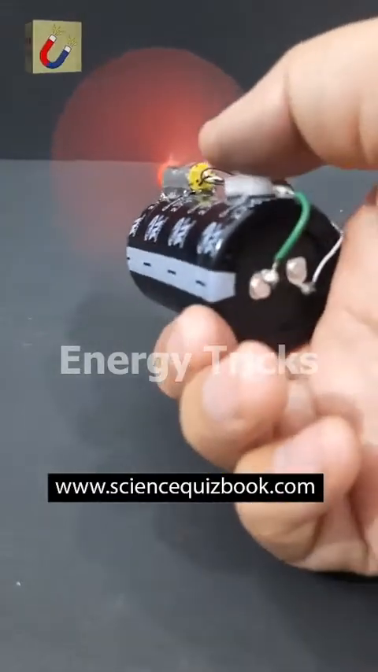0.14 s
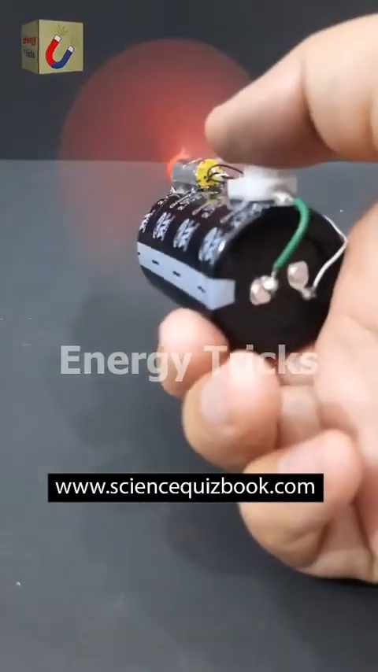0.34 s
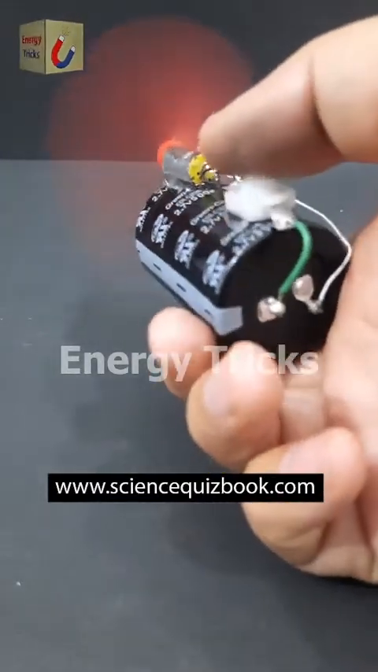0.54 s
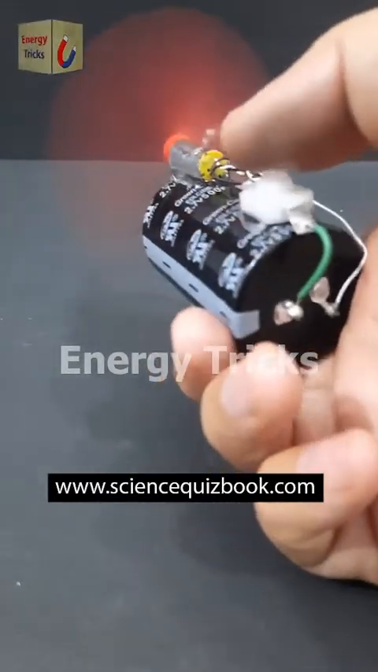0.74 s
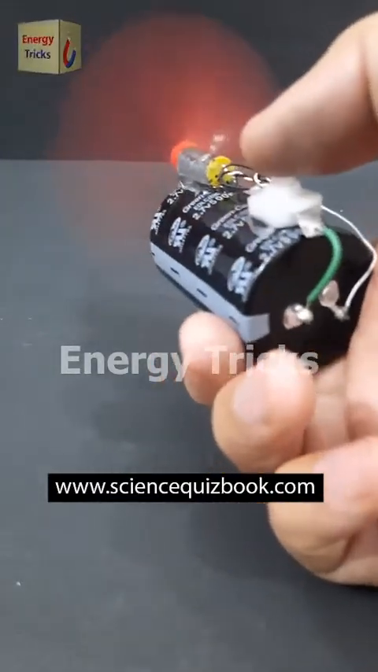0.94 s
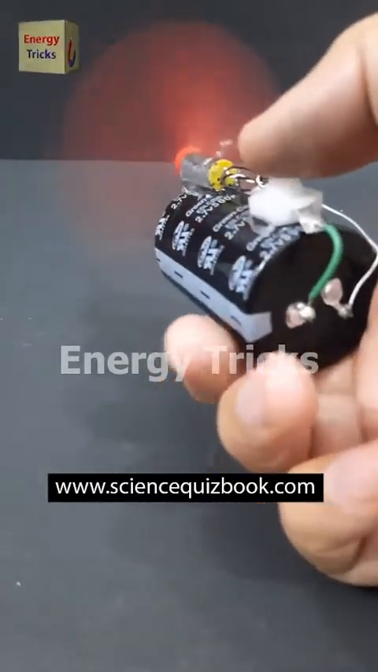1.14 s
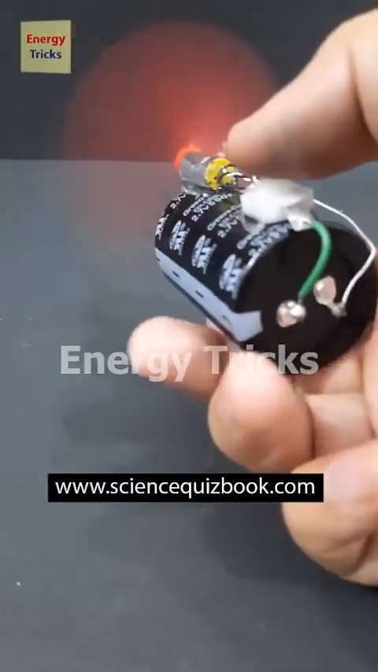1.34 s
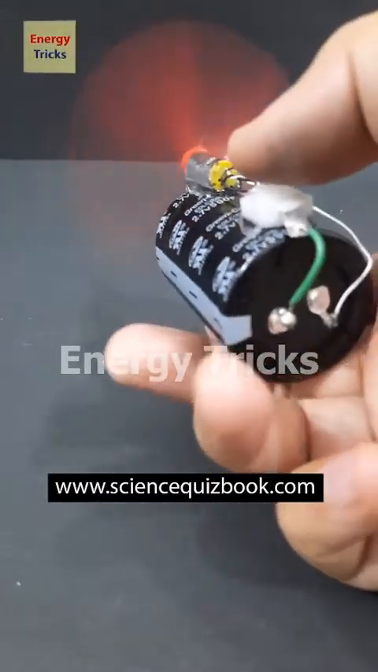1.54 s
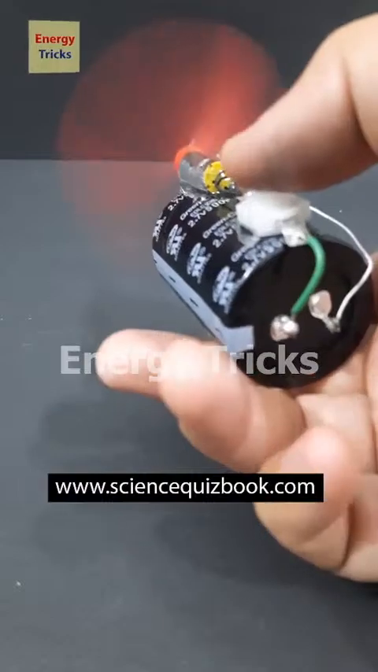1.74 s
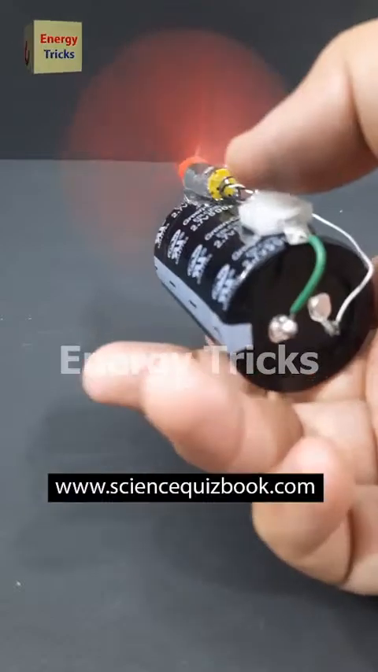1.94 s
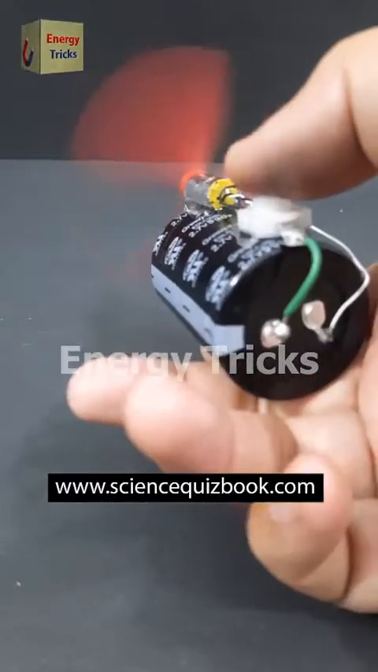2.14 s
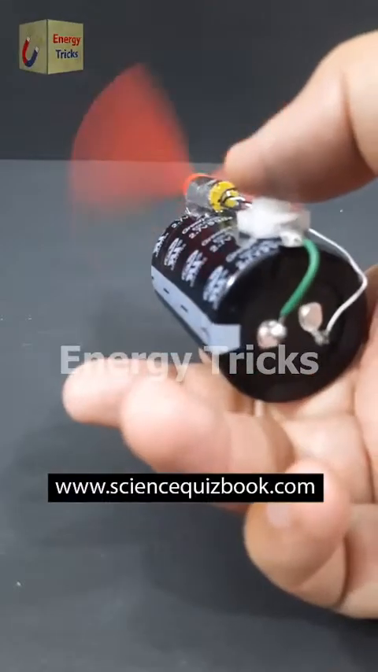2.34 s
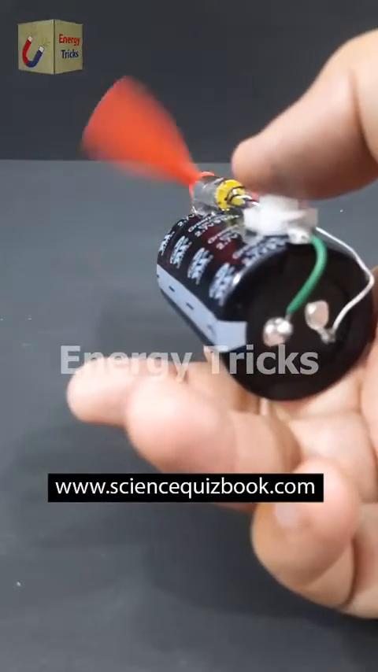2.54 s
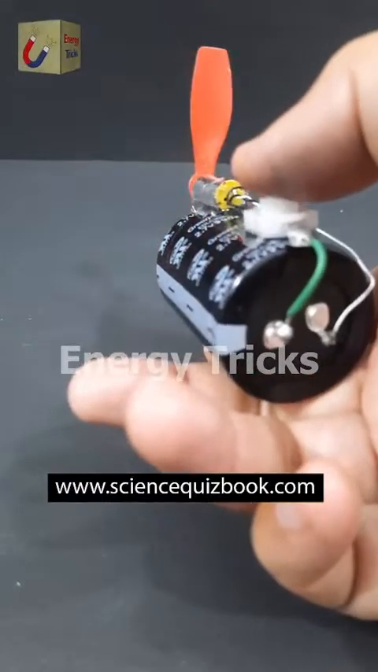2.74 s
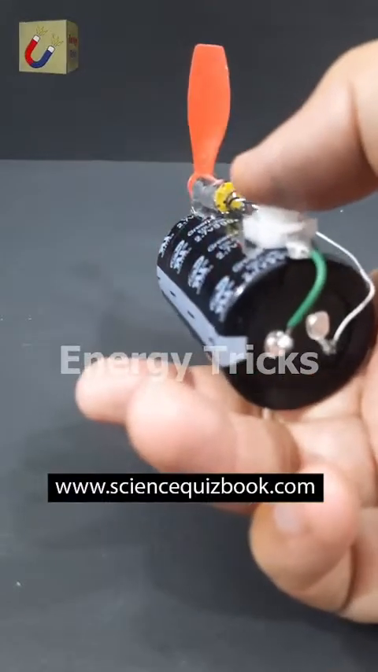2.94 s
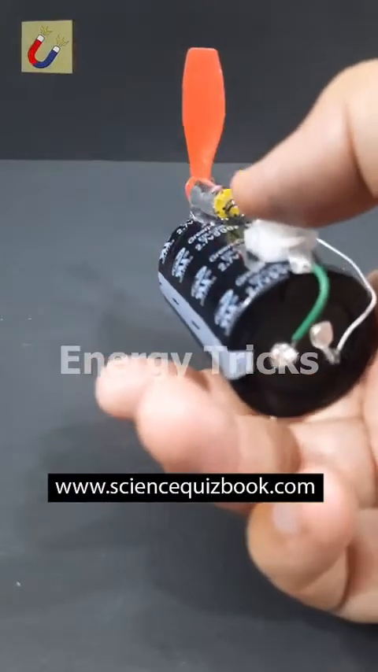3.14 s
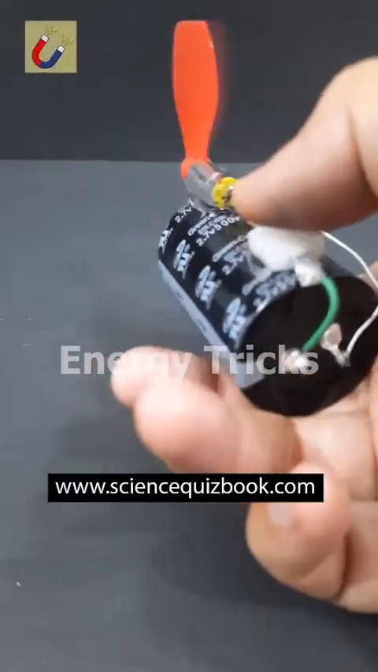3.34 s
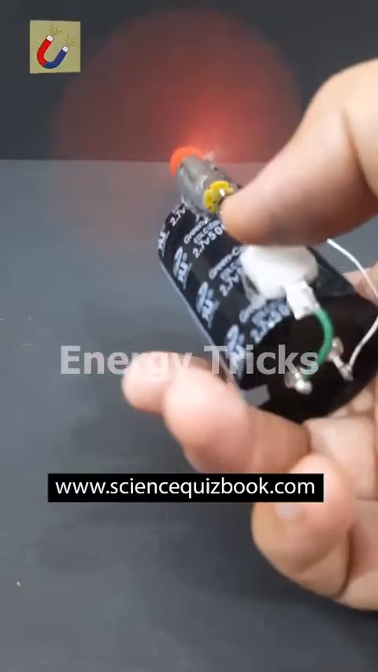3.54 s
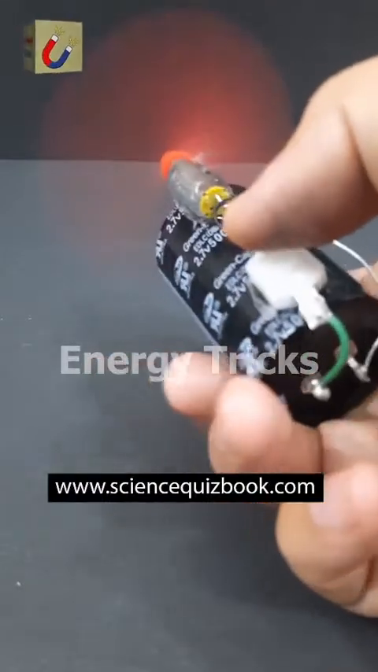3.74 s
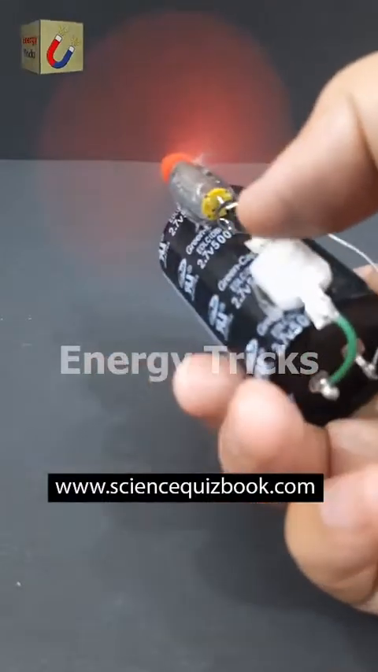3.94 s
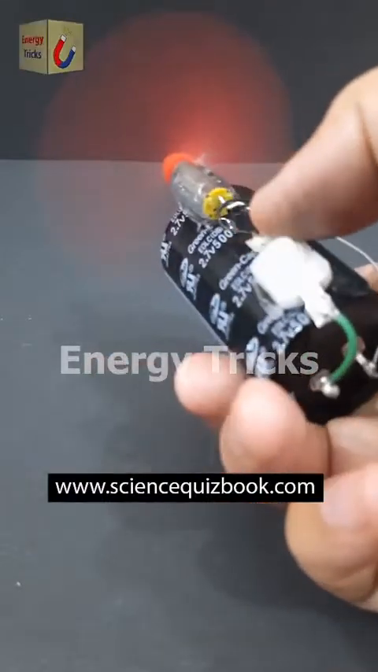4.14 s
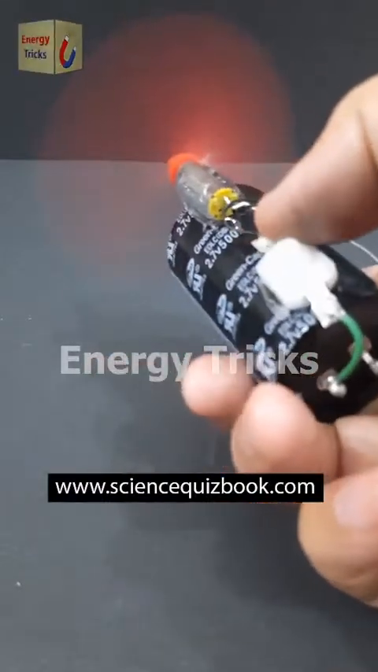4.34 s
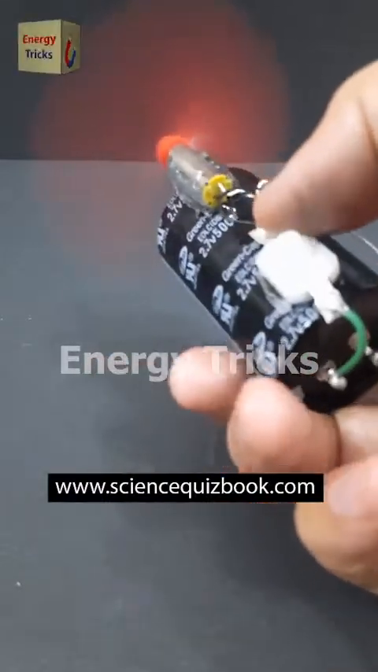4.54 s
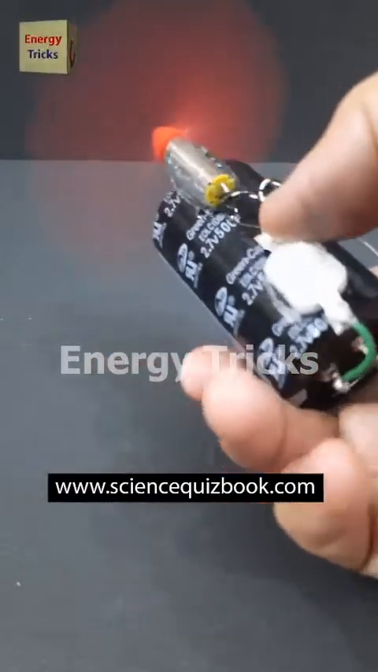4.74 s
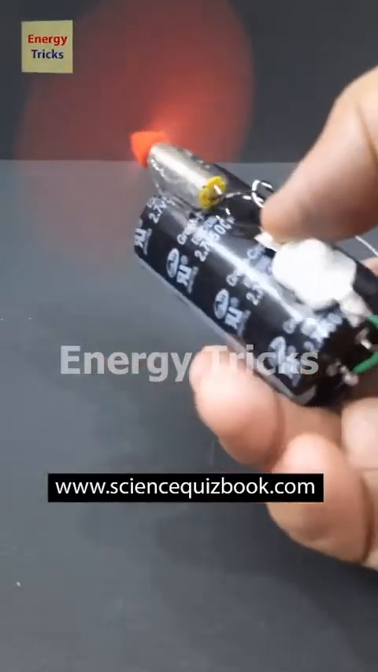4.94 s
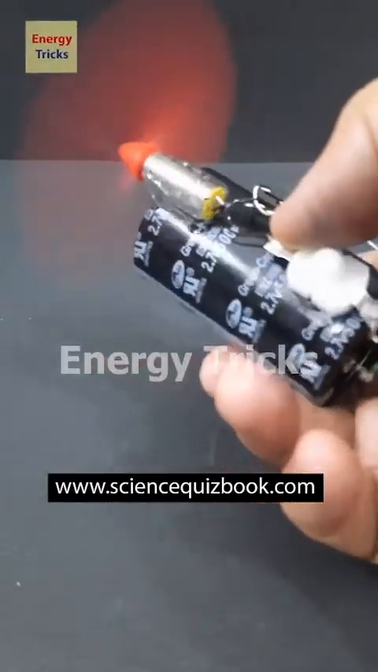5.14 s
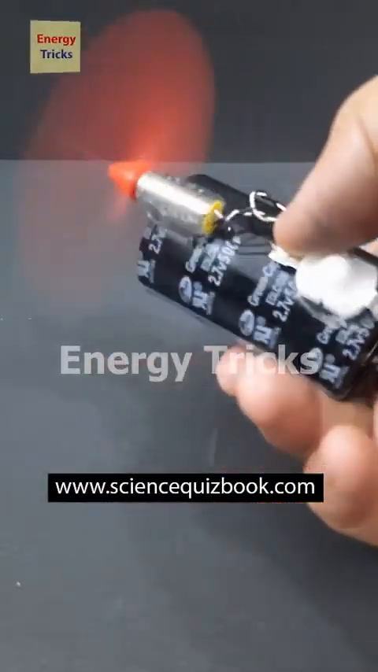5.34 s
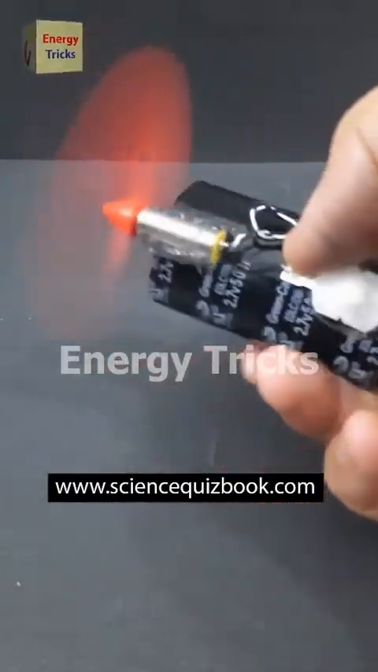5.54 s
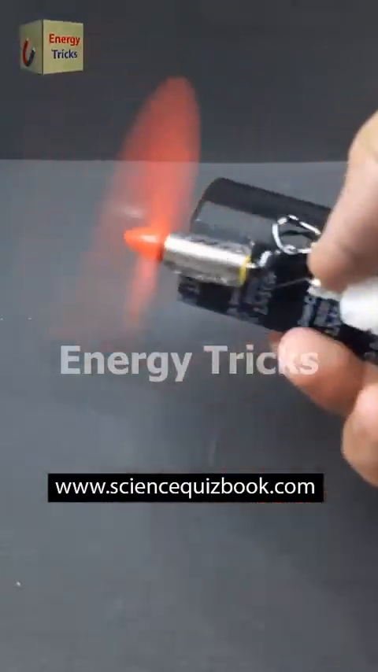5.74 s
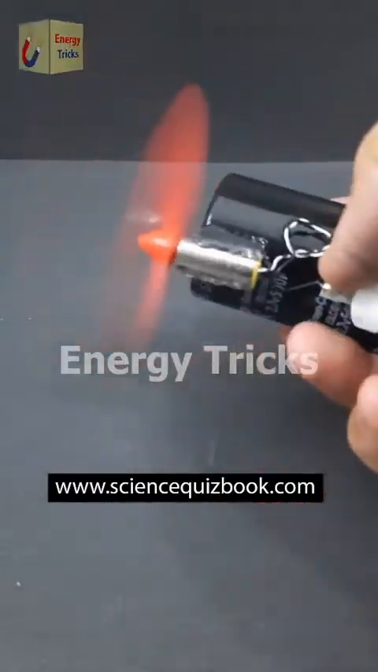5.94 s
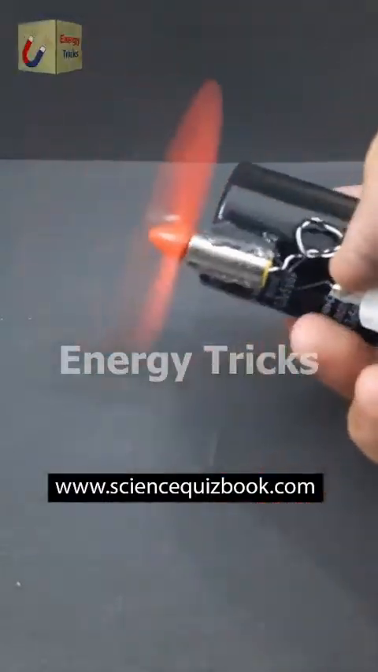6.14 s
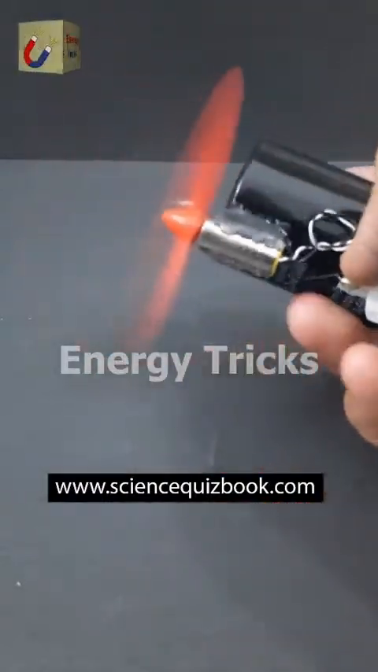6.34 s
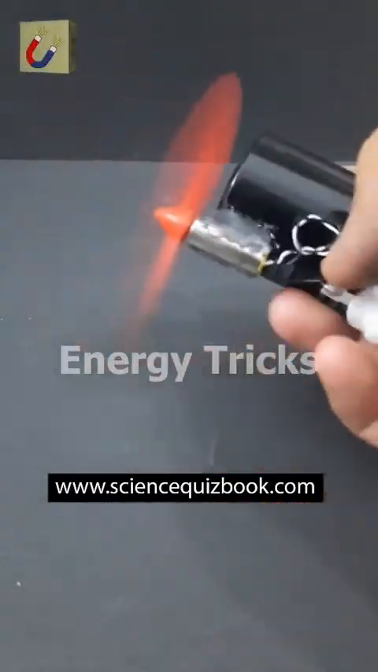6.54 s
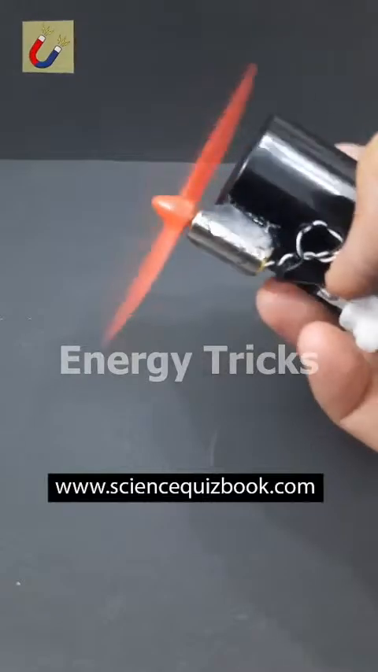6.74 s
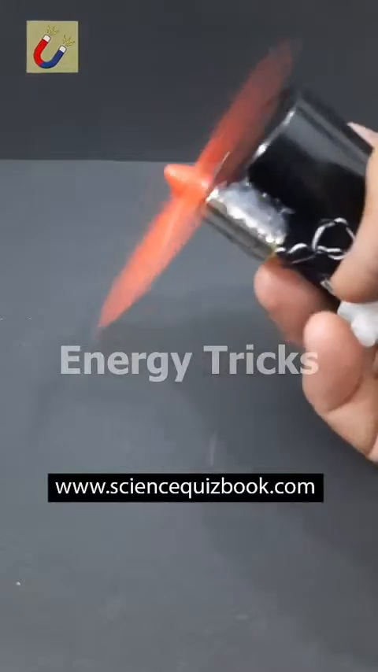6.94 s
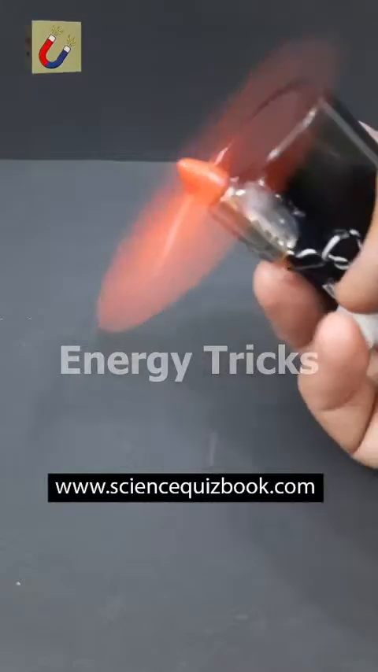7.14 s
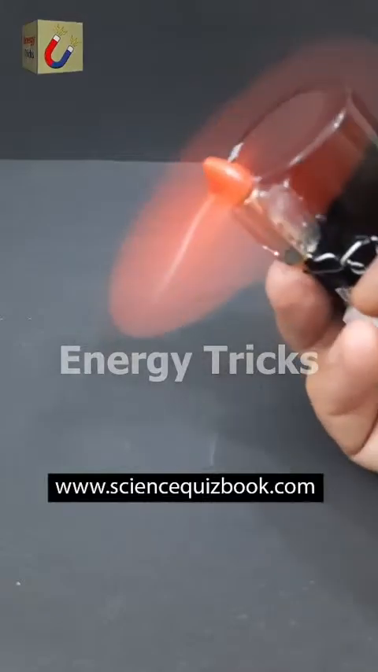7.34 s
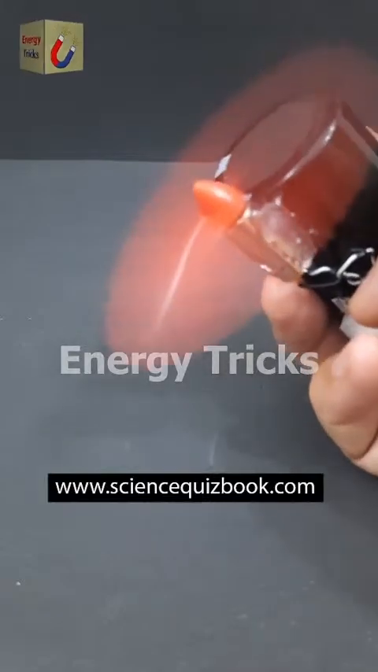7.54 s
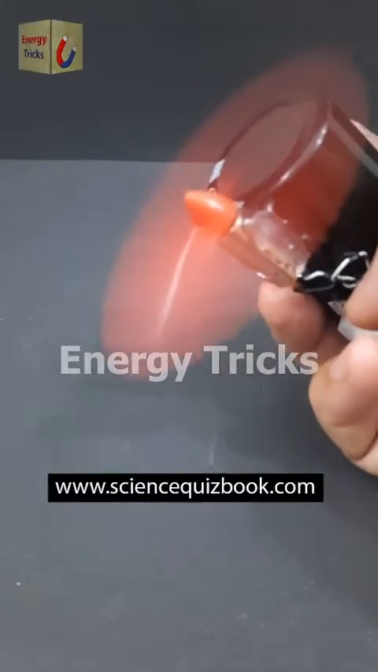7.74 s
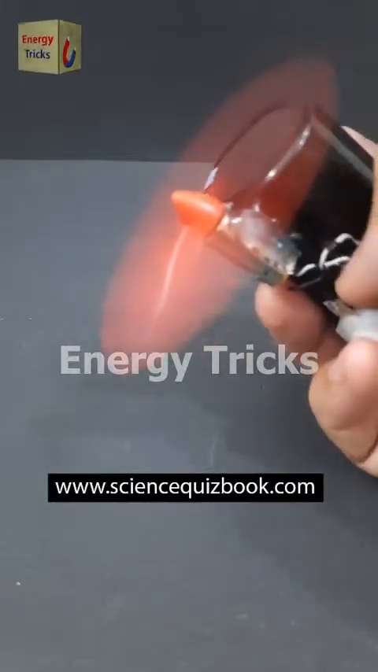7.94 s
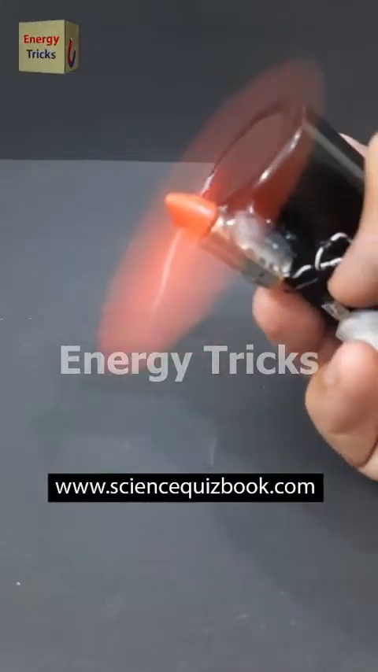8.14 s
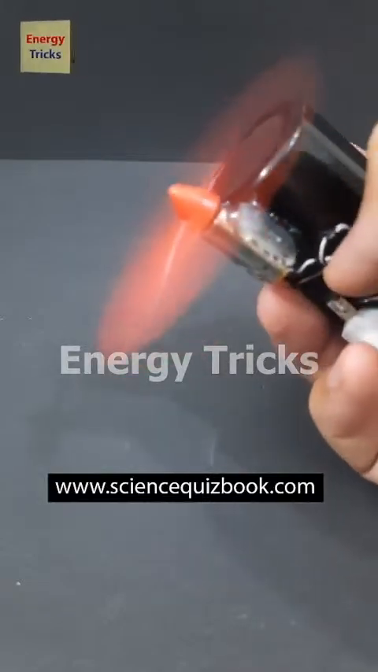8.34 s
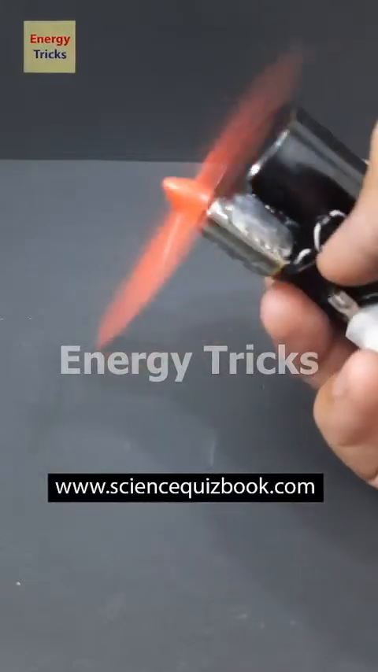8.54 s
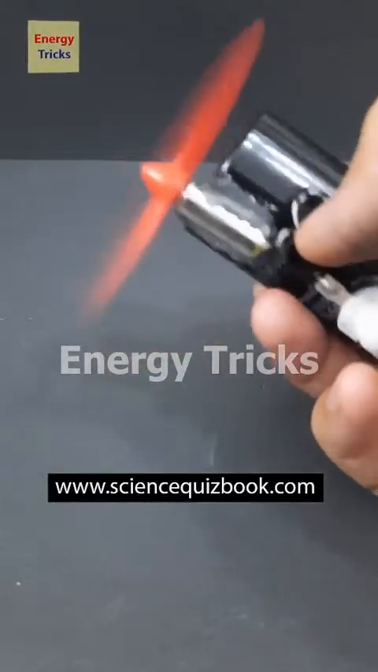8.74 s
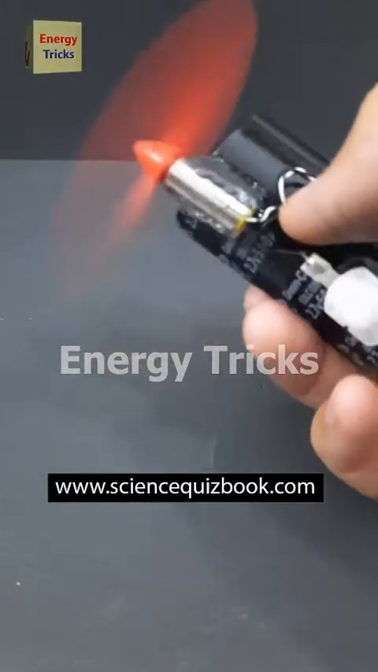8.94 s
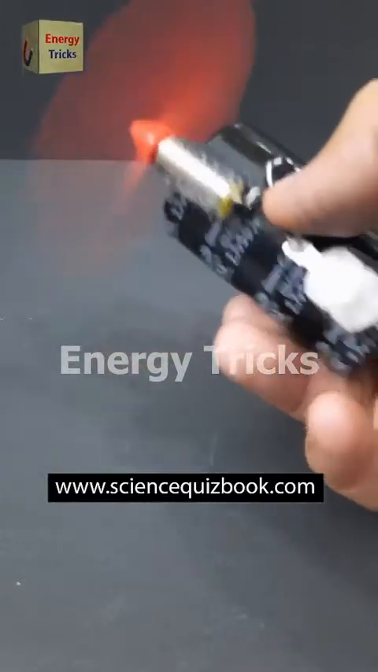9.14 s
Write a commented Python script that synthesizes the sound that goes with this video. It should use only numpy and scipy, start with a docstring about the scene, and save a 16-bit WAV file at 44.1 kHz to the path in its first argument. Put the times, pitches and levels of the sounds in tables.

```python
"""Indoors, close to a two-microphone phone, a hand holds a tiny motor with a two-blade plastic propeller.
It runs down, a push switch clicks, it spins up again and is slowly turned about, so the tones swell and fade.
The tones follow the shaft angle; the air is filtered noise, with gusts mostly on the left microphone port.
A machine hums in the room, and the phone's gain control lifts the sound during the pause."""
import sys
import numpy as np
from scipy import signal
from scipy.fft import rfft, irfft, next_fast_len
from scipy.io import wavfile
from scipy.ndimage import uniform_filter1d, minimum_filter1d, map_coordinates

SR = 44100
rng = np.random.default_rng(int(sys.argv[2]) if len(sys.argv) > 2 else 0)


def dump(signal):
    """Clip the signal to [-1, 1] and save it as 16-bit WAV at the path in sys.argv[1]."""
    limited = np.clip(np.atleast_2d(signal).T, -1, 1)
    pcm = np.round(limited * 32767).astype(np.int16)
    wavfile.write(sys.argv[1], SR, pcm)


N = 409248  # length in samples

# how alike moving air sounds at both microphones: frequency_hz, likeness (1 = the same)
AIR_LIKENESS = [(60, 0.37), (300, .7), (1400, 0.3), (3000, 0.072), (15000, 0.16)]
OFF_S, ON_S = 0.066, 3.448  # power cut, power back
START_SPEED = 304  # turns per second before the cut, the full speed that levels refer to


def amp(db):
    """Gain of a level in dB."""
    return np.exp(np.asarray(db, np.float32) * np.float32(np.log(10) / 20))


def unit(x):
    """Scale each row to rms 1."""
    return x / np.sqrt(np.mean(abs(x) ** 2, axis=-1, keepdims=True) + 1e-20)


def along(points, hz):
    """Read a curve of (frequency, value) points on a log frequency axis."""
    point_hz, values = np.transpose(points)
    return np.interp(np.log(hz + 1), np.log(point_hz + 1), values)


def curves(rows):
    """One value per sample for each column after the time."""
    time_s, *columns = np.transpose(rows)
    return [np.interp(np.arange(N) / SR, time_s, c).astype(np.float32) for c in columns]


def spin(angle):
    """A unit phasor (a point on a circle) at the given angle in radians."""
    angle = (angle % (2 * np.pi)).astype(np.float32)
    return np.cos(angle) + np.complex64(1j) * np.sin(angle)


def wobble(rate):
    """A smooth random curve with this many knots a second."""
    coarse = np.arange(N // 64 + 2) * 64
    knots = rng.standard_normal(int(N * rate / SR) + 4)
    smooth = map_coordinates(knots, [coarse * rate / SR])
    return np.interp(np.arange(N), coarse, smooth)


def slow(width_hz, count):
    """Complex random envelopes of rms 1 and the given spectral width, drawn at every 32nd sample."""
    knots = next_fast_len(N // 32 + 2)
    hz = np.fft.fftfreq(knots, 32 / SR)
    noise = rng.standard_normal((count, knots, 2)) @ [1, 1j]
    z = unit(np.fft.ifft(np.fft.fft(noise) / (1 + (2 * hz / width_hz) ** 2)))
    z = z.astype(np.complex64)[..., None]
    step = np.arange(32, dtype=np.float32) / 32
    filled = z[:, :-1] + np.diff(z, axis=1) * step  # straight lines between the knots
    return filled.reshape(count, -1)[:, :N]


def filtered(x, response):
    """Pass x through a filter given as a function of frequency."""
    size = next_fast_len(N + SR // 2)
    return irfft(rfft(x, size) * response(np.fft.rfftfreq(size, 1 / SR)), size)[..., :N]


def rush(spectrum, alike, patchy_db, tilt=((1, 0), (2, 0))):
    """Stereo noise, rms 1 a side, with patches of random gain; tilt shifts colour between left and right."""
    hz, frames = np.fft.rfftfreq(2048, 1 / SR), N // 512 + 4
    a, b = rng.standard_normal((2, len(hz), frames, 2)) @ [1, 1j]
    patches = uniform_filter1d(rng.standard_normal(a.shape), size=24, axis=0)
    patches = uniform_filter1d(patches, size=6, axis=1)
    # this mix of shared and opposite noise gives the wanted likeness
    turn = np.arccos(np.clip(along(alike, hz), -1, 1))[:, None] / 2
    mid, side = a * np.cos(turn), b * np.sin(turn)
    gain = amp(along(spectrum, hz)[:, None] + patchy_db * patches / patches.std())
    lean = amp(along(tilt, hz) / 2)[:, None]
    pair = gain * np.array([(mid + side) * lean, (mid - side) / lean])
    return unit(signal.istft(pair, nperseg=2048, noverlap=1536)[1][:, :N])


def shaft_speed():
    """Without power air drag and friction slow the rotor; with power it climbs until torque meets drag."""
    # speed it climbs to under power: time_s, speed (turns per second)
    full_speed = [(3.9, 301.3), (4.05, 301), (4.25, 300.5), (5.0, 297), (5.4, 301), (5.6, 296.6),
                  (5.8, 299), (6.0, 293), (6.4, 292), (6.85, 292.4), (7.6, 295.5), (7.95, 295.5),
                  (8.25, 289), (8.6, 291.4), (8.8, 289.9), (9.28, 292.5)]
    drag, friction = 0.0098, 0.6  # loss of speed: drag x speed squared + friction x speed (per s)
    pull = 780  # turns per second; motor torque fades with speed, larger = quicker start
    t, full = np.arange(N) / SR, curves(full_speed)[0]
    ratio = drag / friction
    coast = 1 / ((1 / START_SPEED + ratio) * np.exp(friction * np.maximum(t - OFF_S, 0)) - ratio)
    rest = np.exp(-drag * (full + pull) * np.maximum(t - ON_S, 0))
    climb = full * (1 - rest) / (1 + rest * full / pull)
    return np.where(t < ON_S, coast, climb)


def facing(rows):
    """The hand turns the disc: one value per sample for each column of a table by direction."""
    # time_s, angle_deg of the phone from the plane of the disc (behind it negative)
    hand_turn = [(.3, -48), (3.4, -44), (4.95, -54), (5.3, -31), (5.9, -9), (6.75, -5), (7.0, 14),
                 (7.5, 46), (8.0, 43.5), (8.5, 24), (8.8, 3.5), (9.28, -40)]
    angle_deg, *columns = np.transpose(rows)
    now_deg = curves(hand_turn)[0]
    return [np.interp(now_deg, angle_deg, c).astype(np.float32) for c in columns]


def grown(speed, layer):
    """Faster blades sound louder: gain of a layer at this speed against full speed."""
    # for each layer: dB of sound for every dB of speed above the silent one
    growth = dict(odd=3.5, first=2.38, second=2.25, third=2.4, rim=1.7, hiss=2.51, chop=2.37, rumble=1.5)
    silent = 25.3  # turns per second; slower blades stir no audible air
    share = np.maximum((speed - silent) / (START_SPEED - silent), 0)
    return share.astype(np.float32) ** np.float32(growth[layer])


def tone(turn, gains, lead, shake):
    """A sine shaken by the air it passes through, with its own level and phase at each microphone."""
    start = np.complex64(np.sqrt(2) * np.exp(2j * np.pi * rng.uniform()))
    wave = start * (1 + shake) * turn
    return gains * np.array([np.real(wave * spin(np.asarray(lead))), np.real(wave)])


def blade_tones(shaft, speed, odd_db, left2_db, right2_db, left3_db, right3_db, rim_db, rough):
    """Main even orders come from the two blades passing, odd ones from unbalance; rim orders join them."""
    # the blade tone swells and cancels at each microphone: time_s, left_db, right_db, left_lead_rad
    blade_swell = [(.1, -20, -25, .7), (3.5, -20.5, -23, 0.36), (4.1, -22.5, -25, 0.72),
                   (5.25, -23, -24, 0.41), (5.5, -24, -21.5, .3), (5.75, -36, -24.5, 1.8),
                   (6.0, -33.5, -31, 2.42), (6.27, -28.5, -32, 3.2), (6.5, -28.5, -41, 4.68),
                   (7.0, -22, -28.5, 6.23), (7.25, -22.5, -45, 5.5), (7.5, -25, -45, 3),
                   (8.0, -23, -51, 6.2), (8.25, -23, -34, 6.3), (8.75, -22.5, -39, 4.5),
                   (9.0, -27, -41, 4.7), (9.25, -34, -24, 5.1)]
    # colour the gliding tones pass through: frequency_hz, gain_db
    path_colour = [(150, -6.5), (350, 1), (520, 2.5), (600, 0.5), (950, -2.5), (1150, -0.5), (1500, -3),
                   (1800, 0)]
    # small orders: shaft_multiple, level_db above the unbalance tone
    weak_orders = [(3, -8), (5, 2)]
    # orders heard in the plane of the disc: shaft_multiple, level_db
    rim_orders = [(7, -48), (8, -35.5), (10, -46.5), (12, -42.5)]
    slow_rough = 0.76  # slow blades turn in their own wake: roughness added near standstill
    unloaded_db, unload_s = -4.5, 0.15  # coasting blades push less: the loss, and how soon it comes

    left1_db, right1_db, lead = curves(blade_swell)
    slowness = np.clip(1 - speed / START_SPEED, 0, 1)
    shake = (rough + slow_rough * slowness).astype(np.float32) * slow(33, count=3)
    t = np.arange(N) / SR
    idle_db = unloaded_db * np.clip((t - OFF_S) / unload_s, 0, 1) * (t < ON_S)

    def order(k):
        return spin(k * shaft)

    def level(k, layer, *db):
        return amp(np.array(db) + along(path_colour, k * speed)) * grown(speed, layer)

    # the paired numbers are left and right in dB
    odd = amp(odd_db + idle_db) * grown(speed, "odd") * amp([[0], [-4]])
    rim = amp(rim_db) * grown(speed, "rim") * amp([[0], [-3]])
    first = level(2, "first", left1_db, right1_db)
    second = level(4, "second", left2_db, right2_db)
    third = level(6, "third", left3_db + idle_db, right3_db + idle_db)
    out = tone(order(1), odd, 0.4, shake[0])
    out += tone(order(2), first, lead, 0.35 * shake[0])
    out += tone(order(4), second, 1.41, shake[1])
    out += tone(order(6), third, 1.15, 1.6 * shake[2])
    out += sum(tone(order(k), amp(db) * odd, 0.8, shake[1]) for k, db in weak_orders)
    return out + sum(tone(order(k), amp(db) * rim, 1.8, shake[2]) for k, db in rim_orders)


def eddy(angle, width_hz, lead):
    """A swirl of air makes a fuzzy tone, partly shared by both microphones."""
    common, own = slow(width_hz, count=2) * spin(angle)
    left = np.real(common * spin(np.asarray(lead)))
    right = np.real(0.82 * common + 0.62 * own)
    return np.sqrt(2) * np.array([left, right])


def air(shaft, speed, rim_db, left_db, right_db, *chop_db):
    """Eddies swirl with the rotor, so their fuzzy tones sit just under the blade orders; the edges hiss."""
    # eddies cut by both blades in turn: shaft_multiple, width_hz, level_db, left_lead_rad
    eddies = [(3.88, 74, -1, 1.6), (5.8, 180, -1.5, 1.2), (7.6, 200, 3, 1.79), (9.5, 220, -6.5, 0.85),
              (11.4, 150, -9, .1)]
    # whir of the coasting motor: frequency_hz, level_db per Hz
    coast_whir = [(500, -41), (1000, -7.5), (1500, -5), (2000, -5.5), (2550, -1), (3200, -34.5)]
    # body of the hiss: frequency_hz, level_db per Hz
    hiss_body = [(60, -51), (170, -24), (450, -16), (760, -25), (1000, -13.5), (1350, -15), (1950, -7),
                 (2500, -6), (3700, -5), (4300, -1), (6500, -2), (7500, -5), (9000, -22), (10500, -41.5),
                 (11500, -120)]
    # top of the hiss: frequency_hz, level_db per Hz
    hiss_top = [(7000, -120), (8500, -19.5), (10000, -8), (12000, -2), (13500, 0), (16500, -8.5)]
    # colour of the two ports: frequency_hz, extra_db of left over right
    port_tilt = [(300, -3.5), (1500, 7), (2300, -14), (3100, 7.5), (5000, -1)]

    chop = sum(amp(db) * eddy(k * shaft, width_hz, lead) for k, width_hz, db, lead in eddies)
    grip = np.minimum(speed / 290, 1) ** 2.5  # slow blades barely cut eddies: a whir of fixed pitch is left
    chop = grip * chop + (1 - grip) * amp(6.5) * rush(coast_whir, AIR_LIKENESS, patchy_db=-1.5)
    chop = amp(np.array(chop_db) - 3.0) * grown(speed, "chop") * chop
    # a skirt under the blade tone, fainter in the plane of the disc
    skirt = amp(-41.5 - 0.62 * rim_db) * grown(speed, "first") * eddy(1.95 * shaft, 56, 0.26)
    body = amp(1.44) * rush(hiss_body, AIR_LIKENESS, patchy_db=1.36, tilt=port_tilt)
    bright = (speed / 300) ** 0.8  # faster tips hiss higher
    top = bright * amp([[-4], [-7]]) * rush(hiss_top, AIR_LIKENESS, patchy_db=2.16)
    beat = 1 + 0.13 * np.cos(2 * shaft)  # each blade pass swells the hiss a little
    flutter = amp(0.53 * wobble(9) + 0.6 * wobble(40))
    hiss = amp([left_db, right_db]) * grown(speed, "hiss") * beat * flutter * (body + top)
    return chop + skirt + hiss


def slipstream(speed, rumble_db):
    """Moving air rumbles in lumps on the ports; single blows thump the left one."""
    # single blows of air: time_s, peak_db, pitch_hz
    puffs = [(7.575, -37, 70), (8.043, -29, 85)]
    # colour of the rumble: frequency_hz, level_db per Hz
    gust_colour = [(20, -29), (50, -4), (75, 1), (150, -3), (250, -16), (500, -53.5)]
    lumps = unit(amp(2.4 * wobble(16)) * rush(gust_colour, AIR_LIKENESS, patchy_db=4.0))
    out = amp(rumble_db) * grown(speed, "rumble") * lumps
    t = np.arange(-2000, 2000) / SR
    for time_s, db, hz in puffs:
        blow = np.exp(-(t * hz * 1.6) ** 2) * np.cos(2 * np.pi * hz * t)
        out[0, round(time_s * SR) - 2000:][:len(t)] += amp(db) * blow
    return out


def room():
    """A diffuse echo tail, energy 1 on the left, in which each frequency dies at its own speed."""
    # how fast the room falls silent: frequency_hz, time_s to fall by 60 dB
    decay = [(500, 0.43), (4000, 0.25), (14000, 0.24)]
    hz, t, z = signal.stft(rng.standard_normal((2, SR // 2)), SR, nperseg=256)
    fading = z * amp(-60 * t / along(decay, hz)[:, None])
    tail = signal.istft(fading, SR, nperseg=256)[1][:, :SR // 2]
    return tail / np.linalg.norm(tail[0])


def switch():
    """Each snap is a short broad rattle, a table echo and the room's tail."""
    # time_s, level_db before the snap's colour, pan_db (left minus right)
    clicks = [(0.3214, -9, 4.5), (3.2743, -19.5, 9.5), (3.4474, -18.5, 3)]
    # colour of the snap: frequency_hz, level_db per Hz
    snap_colour = [(300, -27.5), (1200, -17.5), (2700, -5), (6800, 1.5), (8800, -17.5), (11500, -10.5),
                   (16000, -5)]
    snaps, t = np.zeros((2, N)), np.arange(SR // 2) / SR
    for time_s, db, pan_db in clicks:
        fade = amp(-60 * t / 0.012) * np.minimum(t / 0.0013, 1)  # rises in 1.3 ms, falls 60 dB in 12 ms
        rattle = fade * rng.standard_normal((2, len(t)))
        rattle[:, 30] += 1.5  # the dome snaps through in one sharp blow
        echo = amp(-27) * np.roll(rattle, round(0.016 * SR), axis=1)
        direct = amp(pan_db * np.array([[0.5], [-0.5]])) * (rattle + echo)
        snaps[:, round(time_s * SR):][:, :len(t)] += amp(db + 3) * (direct + amp(6) * room())
    return filtered(snaps, lambda hz: amp(along(snap_colour, hz)))


def background():
    """A machine hum of wavering sines over faint room noise."""
    # tones of the machine: pitch_hz, width_hz, level_db, steady_share
    hum_tones = [(271.6, 6.7, -15, 2), (616.5, 11, -8, 2.05), (310, 30, -18.5, 1), (558, 50, -10.5, 0.5),
                 (1380, 8.7, -34.5, 1.5), (4870, 20, -42, 3.5)]
    # level of hum and room noise together: time_s, level_db
    hum_level = [(0, -64), (.8, -57), (1.05, -64), (9.28, -57)]
    # colour of the room noise: frequency_hz, level_db per Hz
    room_colour = [(20, -61.5), (65, -23.5), (230, -29.5), (430, -26), (620, -13.5), (800, -24.5),
                   (1050, -39.5), (1350, -28), (2300, -40), (5000, -41), (9000, -55), (12500, -46.5),
                   (15000, -54), (16000, -69)]
    # likeness of the room noise at both microphones: frequency_hz, likeness (negative = opposite)
    room_likeness = [(60, .45), (290, 0.73), (700, 0.63), (1300, -.2), (3000, -0.38), (12000, .6)]
    t = np.arange(N) / SR
    hum = 0
    for hz, width_hz, db, steady in hum_tones:
        waver = steady + slow(width_hz, count=1)[0]
        hum = hum + amp(db) * np.real(waver * spin(2 * np.pi * hz * t))
    noise = amp(-7) * rush(room_colour, room_likeness, patchy_db=0.5)
    return amp(curves(hum_level)[0]) * (unit(hum) * amp([[0.3], [-0.3]]) + noise)


def scene():
    """Motor, slipstream, switch and room, all moving air and tones driven by one shaft."""
    # tones by direction: angle_deg, unbalance_db, second_left_db, second_right_db,
    # third_left_db, third_right_db, rim_orders_db, roughness (0-1)
    tone_directions = [(-60.5, -48, -25, -27.5, -28.5, -33, -13.5, 0.19),
                       (-34, -48, -22.5, -27, -29.5, -31.5, -5.5, 0.08),
                       (-8.5, -46, -22.5, -25, -29, -29.5, 4.5, 0.07),
                       (-2.5, -49.5, -25.5, -29, -31, -39, 1, 0.04),
                       (25, -50.5, -18, -32, -30.5, -45, 0, 0.58),
                       (39.5, -52, -24.5, -43, -30, -40.5, -5.5, 0.63)]
    # air by direction: angle_deg, hiss_left_db, hiss_right_db, chop_left_db, chop_right_db,
    # rumble_left_db, rumble_right_db
    air_directions = [(-60.5, -23, -24.5, -34, -31, -54, -64.5), (-34, -26.5, -27, -30, -30, -61.5, -65.5),
                      (-11, -27, -28, -32.5, -34.5, -69, -69), (1, -26, -28.5, -29.5, -34.5, -66, -69),
                      (16, -23.5, -29.5, -26, -32, -61.5, -77), (44, -22.5, -30, -27, -32.5, -48.5, -67)]
    speed, tones_at, air_at = shaft_speed(), facing(tone_directions), facing(air_directions)
    shaft = 2 * np.pi * np.cumsum(speed * (1 + 0.001195 * wobble(12))) / SR  # angle, slightly unsteady
    rim_db = tones_at[-2]
    motor = blade_tones(shaft, speed, *tones_at) + air(shaft, speed, rim_db, *air_at[:4])
    return motor + slipstream(speed, air_at[-2:]) + switch() + background()


def record(dry):
    """Gain control lifts sound that has stayed quiet and lets go late when it gets loud; then the band limit."""
    boost_db, quiet_db = 8.5, -24  # most lift, given to sound below the quiet level
    listen_s, hold_s, lag_s, glide_s = 0.04, 1.104, 0.064, 0.19
    top_hz = 15850  # the band ends here
    hold, glide = round(hold_s * SR), round(glide_s * SR)
    power = uniform_filter1d(np.mean(dry ** 2, axis=0), size=round(listen_s * SR))
    level_db = 10 * np.log10(abs(power) + 1e-12)
    lift_db = np.clip(2 * (quiet_db - level_db), 0, boost_db)
    # the origins make both filters look back in time only
    lift_db = minimum_filter1d(lift_db, size=hold, mode="nearest", origin=(hold - 1) // 2)
    lift_db = uniform_filter1d(lift_db, size=glide, mode="nearest", origin=(glide - 1) // 2)
    late_db = np.interp(np.arange(N) - lag_s * SR, np.arange(N), lift_db)
    return filtered(amp(late_db) * dry, lambda hz: 1 / (1 + np.exp(np.clip((hz - top_hz) / 45, -50, 50))))


dry = scene()
out = record(dry)
dump(out)
```